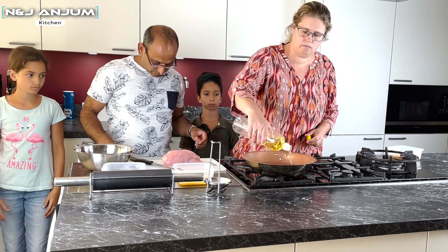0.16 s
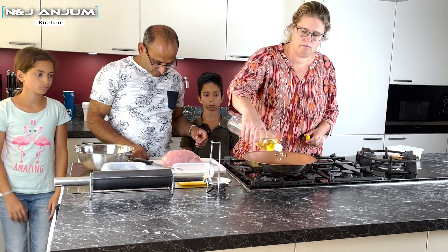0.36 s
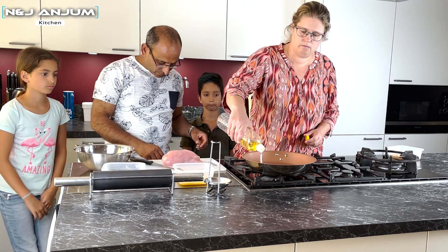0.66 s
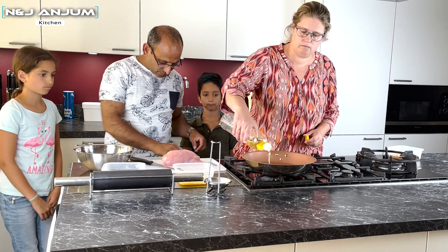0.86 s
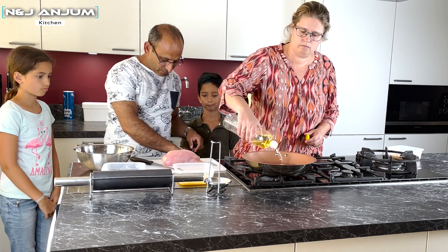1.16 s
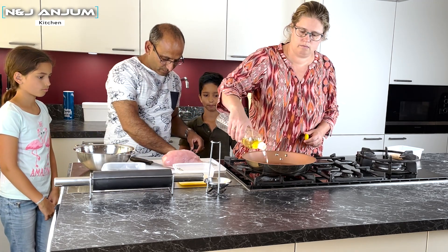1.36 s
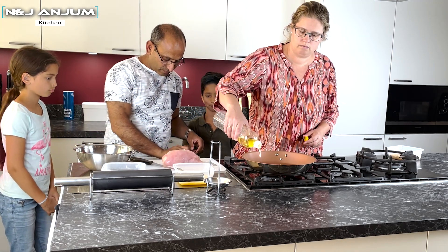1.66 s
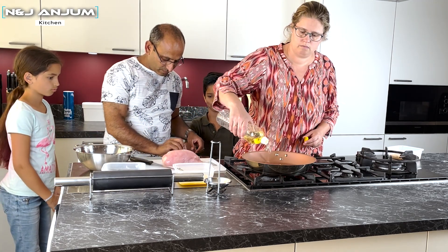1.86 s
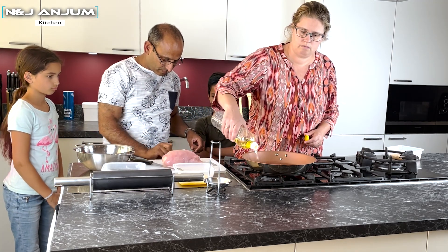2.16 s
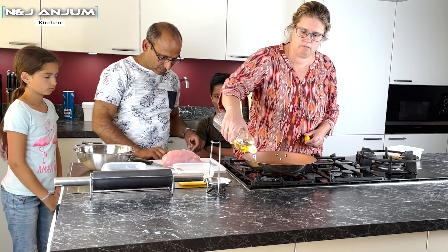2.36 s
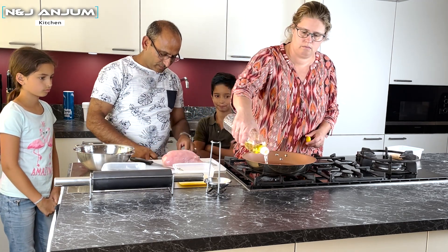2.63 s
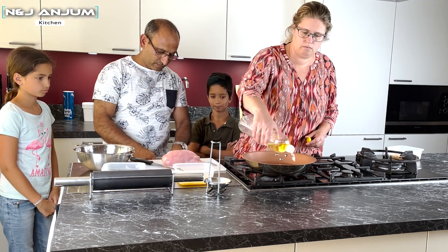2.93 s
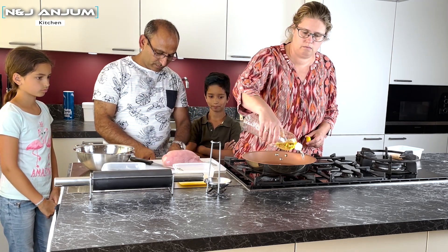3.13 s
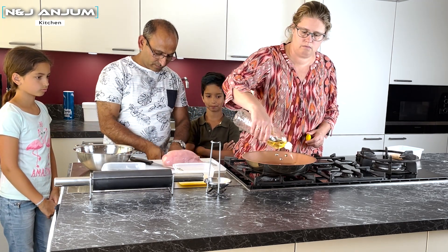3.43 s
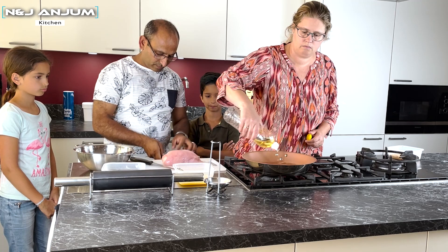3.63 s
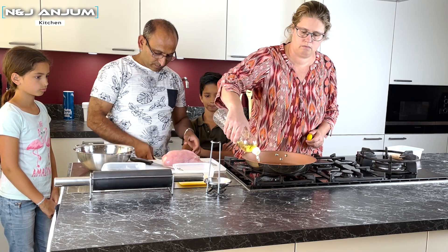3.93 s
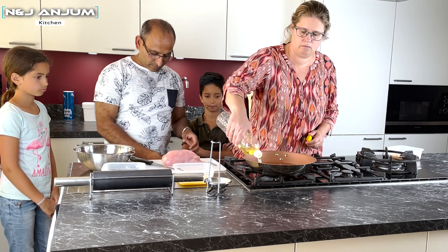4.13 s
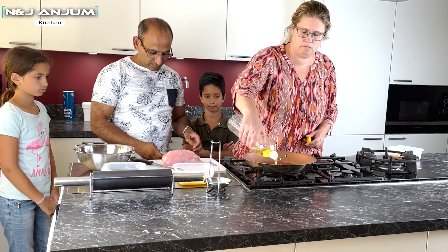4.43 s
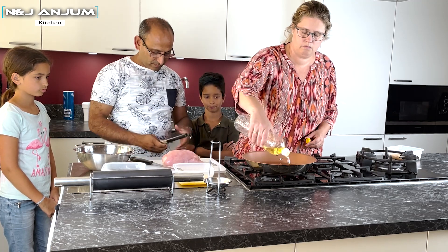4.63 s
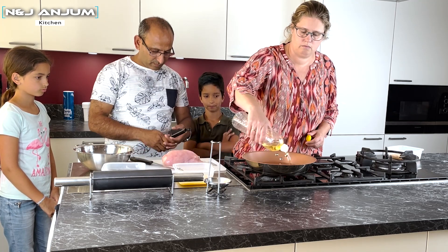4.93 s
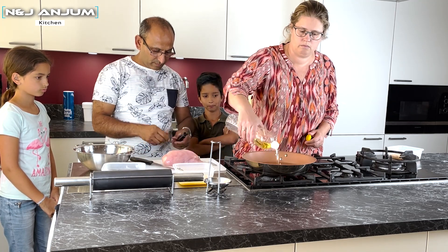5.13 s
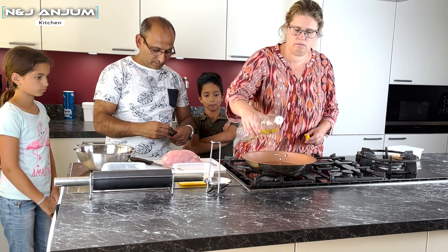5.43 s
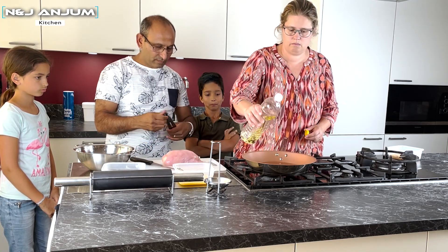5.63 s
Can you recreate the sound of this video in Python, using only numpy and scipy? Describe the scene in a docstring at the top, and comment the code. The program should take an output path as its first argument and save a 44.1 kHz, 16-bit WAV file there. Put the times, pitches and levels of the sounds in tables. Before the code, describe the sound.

After a quiet second of room hush, someone rummages in a wooden cutlery drawer: a loud knock, then uneven bumps and bright steel clinks for about two seconds. A pause, another clattering burst, then near quiet with a very faint oil trickle and tiny counter taps. Low thuds underneath. Hard-walled home kitchen, stereo microphone a few metres away, roomy sound.

```python
"""Someone rummages in a cutlery drawer: struck wood knocks and booms, steel clinks and rattles, both as decaying
modes excited by contact noise. Small things are tapped on the counter, something rustles, oil runs softly into
a pan as resonant noise, and low thuds shake floor and cabinets. It is a quiet, hard-walled home kitchen with a
steady hush; a pair of microphone ports a few metres away hears mostly the room's answer."""
import sys
import numpy as np
from scipy import signal
from scipy.fft import rfft, irfft, next_fast_len
from scipy.io import wavfile
from scipy.ndimage import map_coordinates

SR = 44100
rng = np.random.default_rng(int(sys.argv[2]) if len(sys.argv) > 2 else 0)


def wav_record(signal):
    """Record a signal, one row per channel, as 16-bit PCM in the file named by sys.argv[1]."""
    frames = np.transpose(np.atleast_2d(signal))
    bounded = np.clip(frames, -1, 1)
    # unit amplitude maps onto the largest positive 16-bit level
    quanta = np.round(bounded * 32767).astype(np.int16)
    wavfile.write(sys.argv[1], SR, quanta)


N = 255128


def drawer():
    """Impact excitation: single blows stand over a random clatter of the same wood and steel."""
    # Blows on the wood. Each row: time in seconds, relative level in dB, strongest pitch in Hz.
    knocks = [(0.257, -51, 1060), (1.4, -36, 401), (1.469, -24, 1060), (1.604, -11.5, 706), (1.642, 3, 500),
              (1.654, 1.5, 270), (1.685, -6.5, 510), (1.706, -11, 520), (1.745, -22.5, 510),
              (1.885, -10.5, 1433), (1.889, -14, 158.3), (2.044, -18, 850), (2.106, -5.5, 328.6),
              (2.35, -18, 301.5), (2.447, -23.5, 900), (2.556, -13.5, 827), (2.559, -12, 299),
              (2.776, -12.5, 319), (3.16, -13.5, 720), (3.326, -5.5, 300), (3.354, -9.5, 333),
              (4.039, -27, 685), (4.086, -13, 1700), (4.188, -14, 329), (4.33, -19.5, 328),
              (5.701, -37, 310), (5.745, -35, 310)]
    # Cutlery striking cutlery. Each row: time in seconds, relative level in dB, strongest pitch in Hz.
    clinks = [(0.037, -52, 12300), (1.399, -45, 5000), (1.465, -27, 12620), (1.6002, -21.5, 11680),
              (1.6358, -15.5, 11300), (1.884, -21, 2070), (2.042, -31.5, 2117), (2.262, -32.5, 11730),
              (2.363, -30.5, 3900), (2.765, -24, 10960), (2.9224, -32, 9870), (2.987, -25, 4270),
              (3.016, -17.5, 9550), (3.166, -23.5, 3090), (3.5088, -27.5, 10700), (4.036, -35.5, 2560),
              (4.087, -18.5, 2450), (4.1668, -15, 2475), (4.1781, -10.5, 11680), (4.182, -14, 3080),
              (4.19, -21.5, 6800), (4.229, -25.5, 6140), (4.312, -22, 4510), (4.376, -33, 5560)]
    # Strokes of the hand through the drawer. Each row: start in seconds, length in seconds,
    # relative level of the wood clatter in dB, relative level of the steel rattle in dB.
    strokes = [(1.175, 0.42, -59, -87), (1.445, 0.31, -41, -46.5), (1.685, 0.14, -31, -43.5),
               (1.889, 0.13, -30.5, -45), (2.068, 0.068, -21, -30.5), (2.283, 0.29, -39, -49),
               (2.574, 0.14, -30.5, -31), (2.725, 0.071, -24.5, -38.5), (2.902, 0.15, -38.5, -54.5),
               (3.03, 0.185, -30.5, -25.5), (3.121, 0.038, -26, -15.5), (3.221, 0.024, -22.5, -45),
               (3.339, 0.067, -21, -32), (3.486, 0.067, -38.5, -47), (4.054, 0.11, -29, -36.5),
               (4.196, 0.052, -28, -26), (4.314, 0.097, -32, -53.5)]

    s, db, hz = np.transpose(knocks)
    out = wood(s, db - 5.0, db - 6.5, hz, focus_db=17, scatter_db=3.5, t60=0.018, rise=0.0015)
    s, db, hz = np.transpose(clinks)
    out += cutlery(s, db - 5.5, hz, ring_db=-3, focus_db=28, t60=0.044, rise=0.002)

    start_s, length_s, *levels = np.transpose(strokes)
    wood_db, steel_db = [swells(start_s, length_s, db, swell_db_per_s=898, fade_db_per_s=250) for db in levels]
    s, db, hz = jostles(wood_db, rate=110, spread_db=2.2, lo_hz=260, hi_hz=1000)
    out += wood(s, db - 20, db - 3.5, hz, focus_db=1.0, scatter_db=4.0, t60=0.014, rise=0.00036)
    s, db, hz = jostles(steel_db, rate=250, spread_db=5.55, lo_hz=2700, hi_hz=12000)
    out += cutlery(s, db - 5.5, hz, ring_db=-19, focus_db=17.5, t60=0.0052, rise=0.0012)
    return out


def wood(s, ring_db, crack_db, hz, focus_db, scatter_db, t60, rise):
    """Modal response of a struck wooden box: its damped modes ring beside the noise of contact."""
    # Modes of the drawer. Each row: frequency in Hz, relative level in dB, decay time t60 in seconds.
    modes = [(164, -5, 0.08), (235, -5, 0.07), (312, -1, 0.047), (450, -6, 0.018), (510, -1.5, 0.034),
             (702, -4, 0.036), (850, -4, 0.028), (1050, -9, 0.033), (1430, -9, 0.032), (1670, -3, .03)]
    # Spectrum of the contact. Each row: frequency in Hz, relative level in dB.
    contact = [(80, -31), (250, -2), (550, -3), (1000, -6), (2000, -19.5), (9000, -37)]
    return ring(s, ring_db, hz, modes, focus_db, scatter_db) + crack(s, crack_db, contact, t60, rise)


def cutlery(s, db, hz, ring_db, focus_db, t60, rise):
    """Contact and modal radiation of steel: high-pitched contacts are bright, low ones dull, as the heap settles."""
    # Modes of the steel. Each row: frequency in Hz, relative level in dB, decay time t60 in seconds.
    modes = [(2060, -6.5, 0.056), (2463, -9.5, 0.078), (3069, -6, 0.12), (3940, -10.5, 0.05),
             (4410, -6, 0.1), (5440, -6, 0.2), (6200, -12, 0.06), (6840, -9.5, 0.064), (9640, -2.5, 0.12),
             (10720, -7, 0.084), (11850, -4, 0.043), (12970, -5, 0.08)]
    # Contact on the flat of a handle. Each row: frequency in Hz, relative level in dB.
    dull = [(700, -2.5), (1900, -5.5), (4000, -7), (7000, -16.5), (12000, -24)]
    # Contact on tines and edges. Each row: frequency in Hz, relative level in dB.
    bright = [(2000, -11), (4500, -2), (6500, -5.5), (9500, 1), (12000, -3.5)]
    bright_db = 3 * np.log2(hz / 5000)
    puffs = crack(s, db - bright_db - 4.0, dull, t60, rise)
    puffs += crack(s, db + bright_db, bright, t60, rise)
    return puffs + ring(s, db + ring_db, hz, modes, focus_db, scatter_db=2.5)


def jostles(level_db, rate, spread_db, lo_hz, hi_hz):
    """Random point process: of the small contacts (s, dB, Hz) few are strong; pitch drifts as the heap shifts."""
    time_luck, size_luck, pitch_luck = rng.random((round(rate * N / SR), 3)).T
    s = time_luck * (N - 1) / SR
    at = (s * SR).astype(int)
    db = level_db[at] - spread_db * np.log(size_luck + 0.015)
    drift = np.clip(pitch_luck / 2 + 0.23 * (1 + wobble(9)[at]), 0, 1)
    return s, db, lo_hz * (hi_hz / lo_hz) ** drift


def counter():
    """Impact spectrum of small hard things set down: the counter's modes ring under a click of its own width."""
    # Taps. Each row: time in seconds, relative ring level in dB, strongest pitch in Hz,
    # relative click level in dB, top of the click in Hz.
    taps = [(0.499, -65, 2310, -63, 2600), (3.759, -41, 1037, -47, 2644), (5.143, -32, 993, -24, 13770),
            (5.154, -33, 3940, -41, 7110), (5.454, -56, 1700, -33.5, 6400), (5.57, -49, 1580, -57, 2064),
            (5.67, -45, 1370, -42.5, 3770), (5.718, -50, 2310, -70, 3000)]
    # Modes of the counter. Each row: frequency in Hz, relative level in dB, decay time t60 in seconds.
    modes = [(990, 6.5, 0.01), (1356, 3, 0.022), (1590, 4.5, 0.011), (2324, 3.5, 0.051), (3860, 8.5, 0.028),
             (5310, 11, 0.032)]
    s, ring_db, hz, click_db, top_hz = np.transpose(taps)
    out = ring(s, ring_db, hz, modes, focus_db=25.5, scatter_db=2.0)
    for k in range(len(s)):  # harder things click higher
        colour = [(450, -30), (850, -2.5), (hz[k], 0), (top_hz[k], -4), (2 * top_hz[k], -22)]
        out += crack(s[k:k + 1], click_db[k:k + 1], colour, 0.025, rise=0.000067)
    return out


def oil_stream():
    """Resonant filtering of noise: a thin stream of oil murmurs in a few broad bands at a wavering level."""
    # Course of the stream. Each row: time in seconds, relative level in dB.
    stream = [(4.76, -83), (4.82, -68.5), (5.1, -71), (5.45, -75)]
    # Resonances. Each row: centre in Hz, width in Hz, relative level in dB.
    resonances = [(1440, 67, -0.5), (5150, 550, -6), (12100, 3100, -13.5)]

    def response(f):
        """Second-order resonance: a sum of band-pass peaks."""
        return sum(amp(db) * 1j * f * width / (centre ** 2 - f * f + 1j * f * width)
                   for centre, width, db in resonances)

    murmur = unit(filtered(rng.standard_normal(N), response))
    return amp(curves(stream)[0] + 2.3 * wobble(8.8)) * murmur


def rustle():
    """Friction noise: one brief, soft brushing sound with a quickly fluctuating level."""
    # Spectrum of the brushing. Each row: frequency in Hz, relative level in dB.
    spectrum = [(900, -29), (1450, -10), (2200, -29.5), (2700, -2.5), (3700, -4.5), (5500, -20),
                (9600, -2.5), (13000, -28)]
    level_db = swells([0.204], 0.045, [-65.5], swell_db_per_s=1600, fade_db_per_s=300)
    return amp(level_db + 4.2 * wobble(60)) * hiss(spectrum)


def thuds():
    """Structure-borne sound: feet and leaning bodies shake floor and cabinets, and a hollow cabinet resonates."""
    # Thuds. Each row: time in seconds, relative level in dB.
    blows = [(0.23, -52.5), (0.502, -54.5), (1.172, -53), (1.469, -46.5), (1.67, -43), (1.94, -34.5),
             (2.099, -36), (2.26, -44), (2.411, -48), (2.602, -35), (2.821, -41.5), (3.182, -33.5),
             (3.4, -39), (3.52, -41.5), (3.784, -45.5), (4.159, -46), (4.278, -44.5), (5.7, -57)]
    # Spectrum of the shaking. Each row: frequency in Hz, relative level in dB.
    boom = [(30, -33), (66, 2.5), (105, -13), (160, -5), (300, -58.5)]
    cabinet = [(67, 0.0046, 0.11)]  # one mode: frequency in Hz, relative level in dB, t60 in seconds
    s, db = np.transpose(blows)
    shake_db = swells(s, 0.013, db, swell_db_per_s=295.5, fade_db_per_s=120.5)
    shaking = amp(shake_db + 0.85 * wobble(16)) * np.array([hiss(boom), hiss(boom)])
    return shaking + ring(s, db + 1.5, cabinet[0][0], cabinet, focus_db=0, scatter_db=3.5)


def kitchen(x, wet_db):
    """Reverberation: direct sound plus a noise tail that decays by band, drawn anew every quarter second."""
    # Room decay. Each row: frequency in Hz, decay time t60 in seconds, relative level in dB.
    room = [(60, 0.9, -7), (248, 0.41, -8.5), (677, 0.36, -0.5), (1780, 0.35, 1), (4700, 0.41, -1.5),
            (12600, 0.3, 0)]
    early_db, early_s = -1.5, 0.034  # near cupboards and counter answer strongly at first
    hop, out = SR // 4, np.zeros((2, N + 2 * SR))
    fade = np.hanning(2 * hop + 1)[:-1]  # overlapping windows sum to one
    x = np.pad(x, (hop, 2 * hop))
    for a in range(0, N + hop, hop):
        hz, t, z = signal.stft(rng.standard_normal((2, SR * 3 // 4)), SR, nperseg=256)
        decay_db = along(room, hz, axis=2) - 60 * t[:, None] / along(room, hz)
        tail = signal.istft(z * amp(decay_db.T), SR, nperseg=256)[1]
        tail *= 1 + amp(early_db) * np.exp(-np.arange(tail.shape[1]) / (early_s * SR))
        tail[:, :100] = 0  # the first wall lies a little further than the direct path
        tail /= np.linalg.norm(tail[0])
        wet = signal.fftconvolve((x[a:a + 2 * hop] * fade)[None], tail, axes=1)
        out[:, a:a + wet.shape[1]] += wet
    return x[hop:hop + N] + amp(wet_db) * out[:, hop:hop + N]


def room_tone():
    """Stationary background noise: a steady hush whose rumble comes in lumps."""
    # Spectral density of the hush. Each row: frequency in Hz, relative level in dB per Hz.
    hush = [(20, -77.5), (50, -74.5), (120, -83.5), (400, -92.5), (1200, -106), (4000, -112), (6400, -116),
            (9800, -112), (11900, -107), (14000, -118), (14700, -140)]
    white = rng.standard_normal((2, N)) * np.sqrt(SR / 2)
    lumps = amp(3.1 * wobble(13.0) + 1.2 * wobble(36))
    low = filtered(white * lumps, lambda hz: amp(along(hush, hz)) / (1 + (hz / 300) ** 2))
    flutter = amp(0.58 * wobble(11.0))
    high = filtered(white * flutter, lambda hz: amp(along(hush, hz)) / (1 + (300 / (hz + 1)) ** 2))
    return low + high


def ring(s, db, pitch_hz, modes, focus_db, scatter_db):
    """Modal superposition: each blow rings every mode at a new strength, most near the blow's own pitch."""
    chance, out = rng.standard_normal((len(s), len(modes))), np.zeros(N)
    for (hz, level_db, t60), luck in zip(modes, chance.T):
        distance_db = focus_db * abs(np.log2(hz / pitch_hz))  # focus_db is the loss per octave
        sign = np.sign(np.sin(1000 * luck))  # a random polarity
        size = amp(db + level_db + scatter_db * luck - distance_db) * sign
        pole, turn = amp(-60 / t60 / SR), 2 * np.pi * hz / SR
        resonator = [1, -2 * pole * np.cos(turn), pole ** 2]
        out += signal.lfilter([0, np.sin(turn)], resonator, spikes(s, size))
    return out


def crack(s, db, spectrum, t60, rise):
    """Contact noise: a puff that swells with time constant rise (s) and dies away with t60 (s)."""
    swell = np.exp(-1 / (rise * SR))
    poles = np.convolve([1, -amp(-60 / t60 / SR)], [1, -swell])
    envelope = signal.lfilter([1 - swell], poles, spikes(s, amp(db)))
    puff = envelope * rng.standard_normal(N)
    return filtered(puff, lambda hz: unit(amp(along(spectrum, hz))))


def swells(start_s, length_s, db, swell_db_per_s, fade_db_per_s):
    """Energy addition: level in dB of overlapping events that swell up to their start, hold and fade."""
    t = np.arange(N) / SR - np.asarray(start_s)[:, None]
    before_s = np.maximum(-t, 0)
    after_s = np.maximum(t - np.reshape(length_s, (-1, 1)), 0)
    event_db = np.asarray(db)[:, None] - (swell_db_per_s * before_s + fade_db_per_s * after_s)
    return 10 * np.log10(np.sum(amp(2 * event_db), axis=0) + 1e-14)


def hiss(spectrum):
    """Spectral shaping: noise of rms 1 with a (Hz, dB) spectrum."""
    return unit(filtered(rng.standard_normal(N), lambda hz: amp(along(spectrum, hz))))


def filtered(x, response):
    """Linear filtering: x times a complex response of frequency."""
    m = next_fast_len(N + SR // 2)
    return irfft(rfft(x, m) * response(np.fft.rfftfreq(m, 1 / SR)), m)[..., :N]


def wobble(rate):
    """Slow random modulation: a smooth curve through random knots, rate knots a second."""
    return map_coordinates(rng.standard_normal(int(N * rate / SR) + 4), [np.arange(N) * rate / SR])


def spikes(s, size):
    """Impulse excitation: one sample of the given size at each time."""
    return np.bincount(np.round(s * SR).astype(int), size, N)[:N]


def curves(rows):
    """Linear interpolation in time: a value per sample for each column after the time; -120 outside the rows."""
    s, *cols = np.transpose(rows)
    return np.array([np.interp(np.arange(N) / SR, s, c, -120, -120) for c in cols])


def along(points, hz, axis=1):
    """Logarithmic frequency scale: interpolates one column of (Hz, value, ..) points on it."""
    points = np.array(points)
    return np.interp(np.log(hz + 1), np.log(points[:, 0] + 1), points[:, axis])


def amp(db):
    """Level law: decibels to an amplitude ratio."""
    return 10 ** (np.asarray(db) / 20)


def unit(x):
    """Normalisation by energy: x scaled to rms 1."""
    return x / np.sqrt(np.mean(x ** 2) + 1e-20)


def scene():
    """Superposition: the reverberant sources, the thuds and the room's hush add linearly."""
    sources = drawer() + counter() + oil_stream() + rustle()
    return amp(-3) * kitchen(sources, wet_db=10) + thuds() + room_tone()


def record(dry):
    """Partial coherence: the right port hears part of the left's sound, turned in phase, and part of its own."""
    # The two ports. Each row: frequency in Hz, likeness from 0 to 1, phase lead of the right in radians,
    # level of the right under the left in dB.
    ports = [(200, .97, -.2, 1.3), (600, .3, -.8, 1.2), (1600, .45, -.3, 2.8), (3500, .4, -1.1, 5),
             (5200, .3, -.6, 5.5), (5800, .4, 1.1, 3.5), (7000, .5, 1.3, 2), (7600, .92, 2.8, .4),
             (8200, 1, 3.05, 0), (8800, 1, 3.2, 0), (9500, .94, 3.9, 0), (11500, .9, 5, 0),
             (13300, 1, 6.28, 0)]
    # Microphone colour. Each row: frequency in Hz, gain in dB.
    mic = [(20, -19), (60, 0.5), (12800, -1), (13600, -7), (15500, -19.5)]
    top_hz = 15850

    def alike(hz):
        """Coherence of the two ports."""
        return along(ports, hz)

    def under(hz):
        """Gain of the right port relative to the left."""
        return amp(-along(ports, hz, axis=3))

    shared = filtered(dry[0], lambda hz: under(hz) * alike(hz) * np.exp(1j * along(ports, hz, axis=2)))
    own = filtered(dry[1], lambda hz: under(hz) * np.sqrt(1 - alike(hz) ** 2))
    pair = filtered(np.array([dry[0], shared + own]), lambda hz: amp(along(mic, hz)))
    return filtered(np.clip(pair, -1, 1), lambda hz: hz < top_hz)  # clipping, then the band limit


dry = scene()
out = record(dry)
wav_record(out)
```